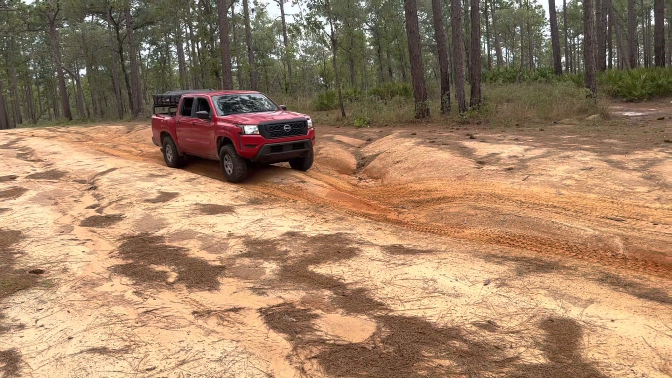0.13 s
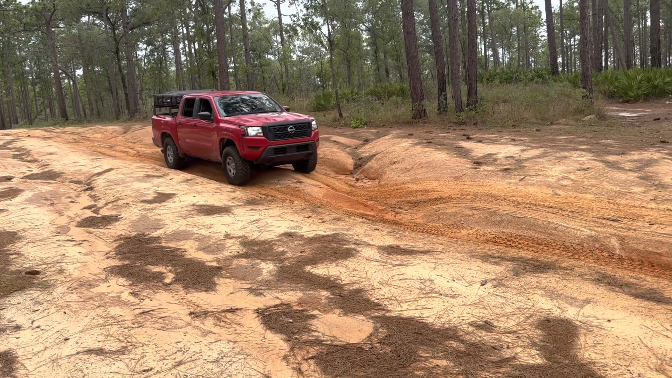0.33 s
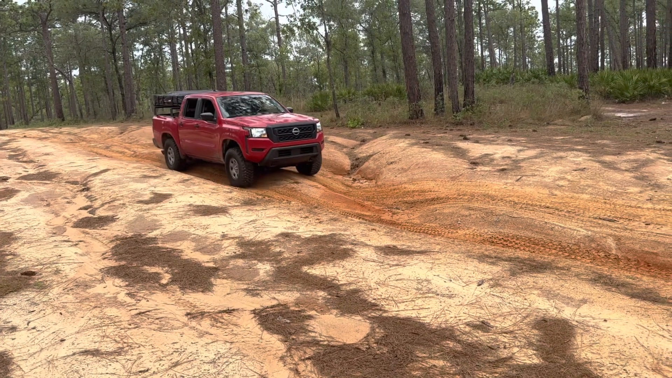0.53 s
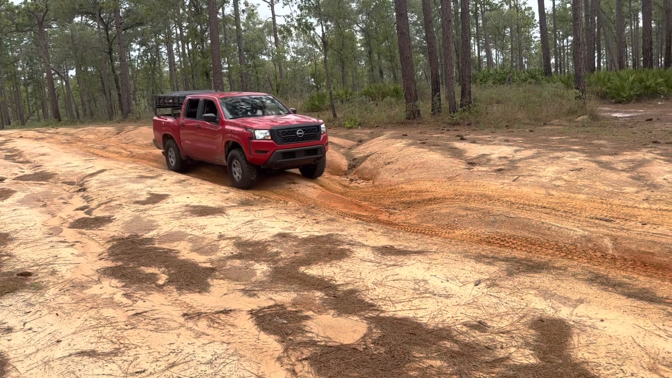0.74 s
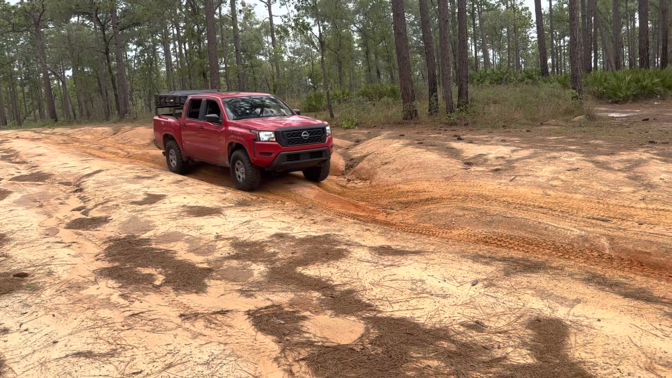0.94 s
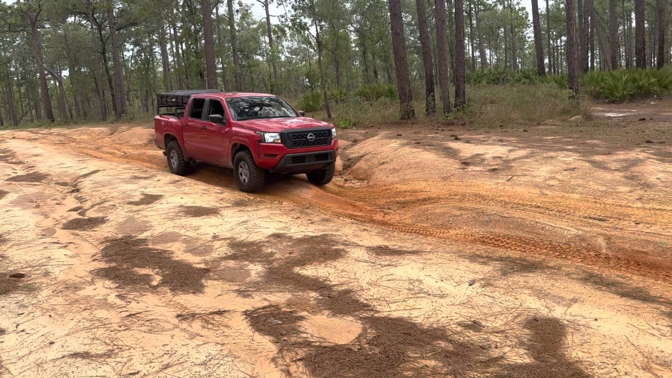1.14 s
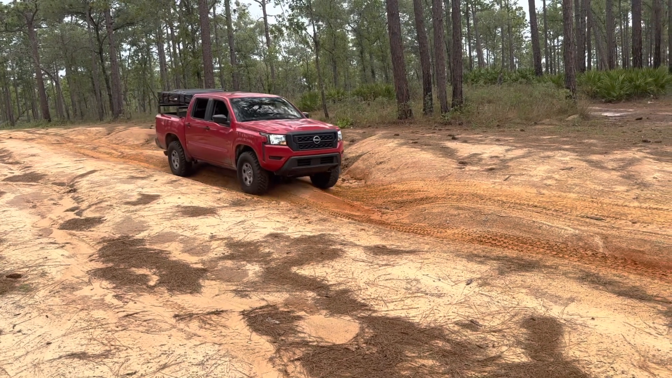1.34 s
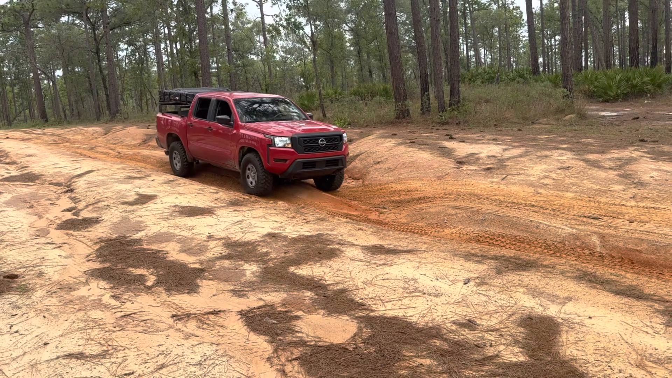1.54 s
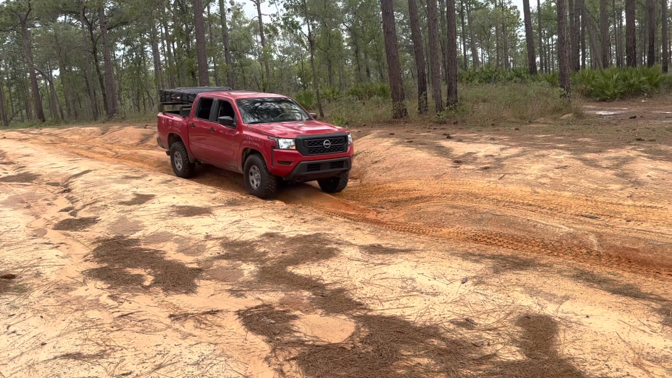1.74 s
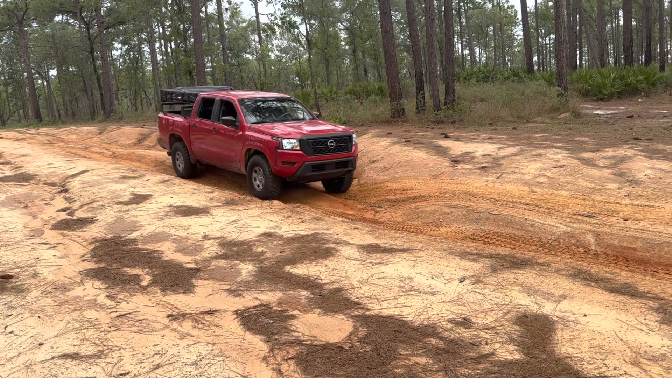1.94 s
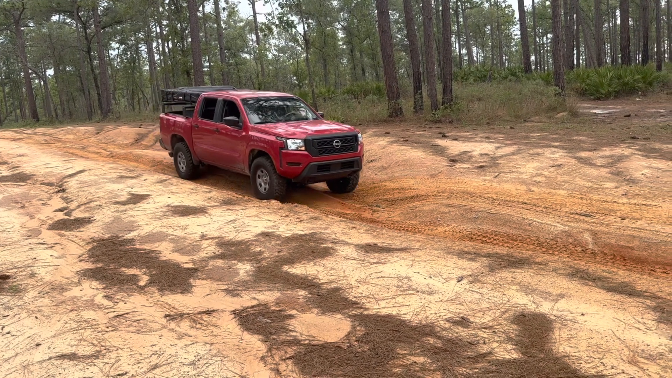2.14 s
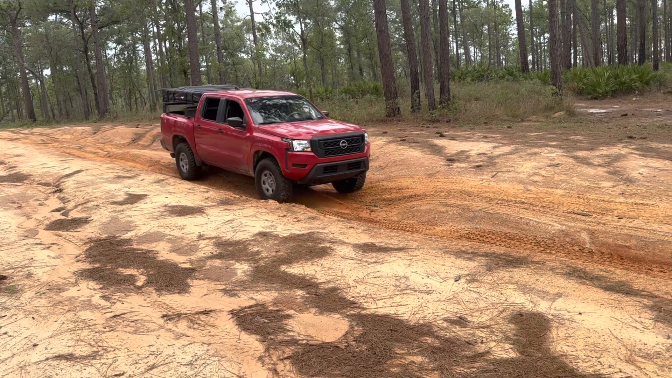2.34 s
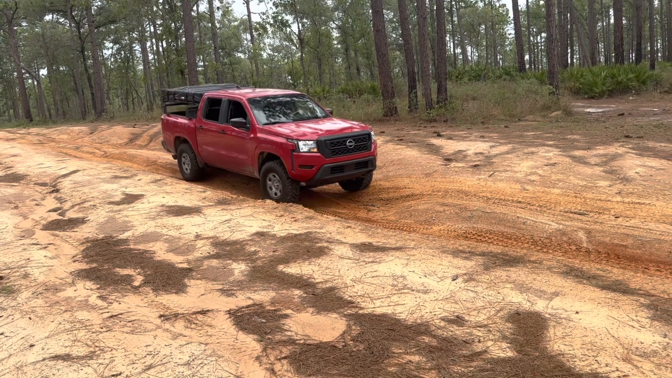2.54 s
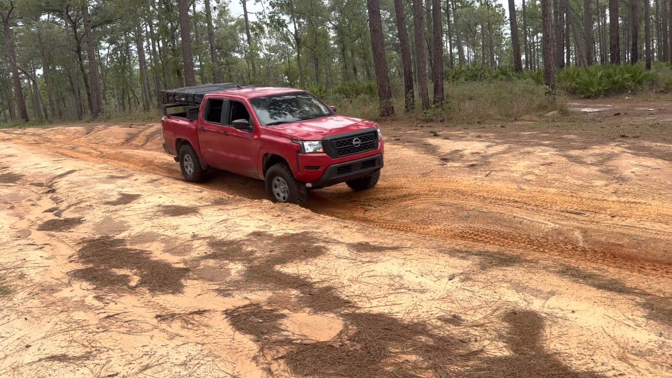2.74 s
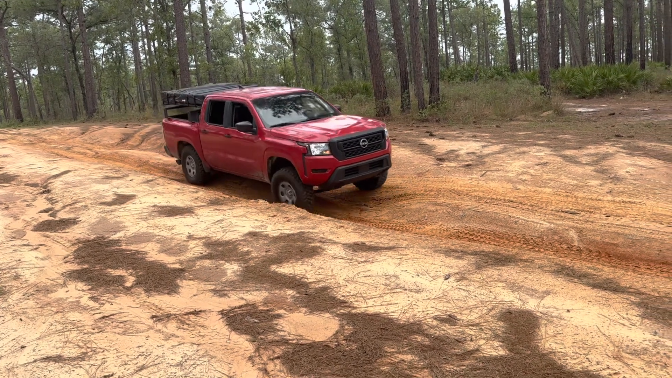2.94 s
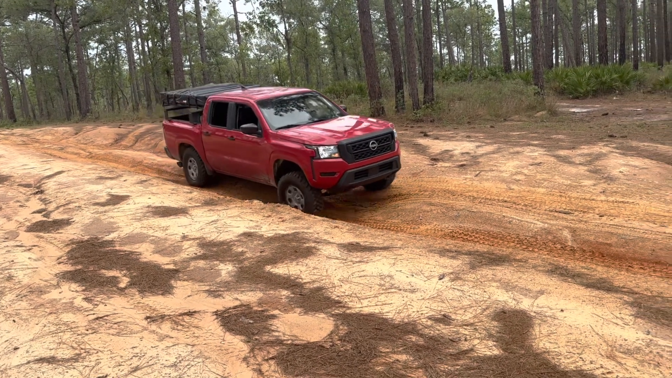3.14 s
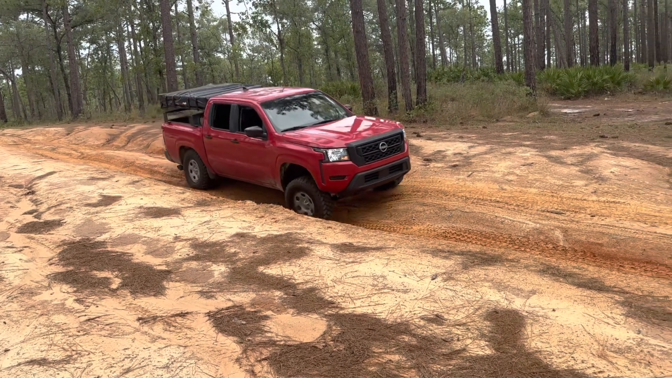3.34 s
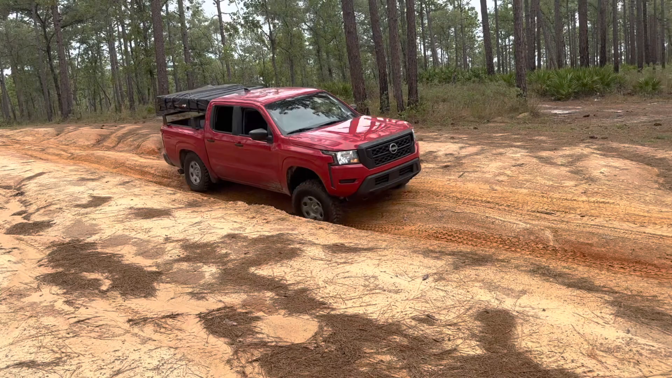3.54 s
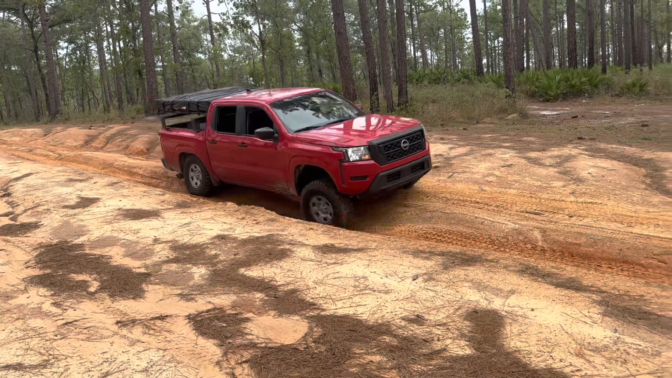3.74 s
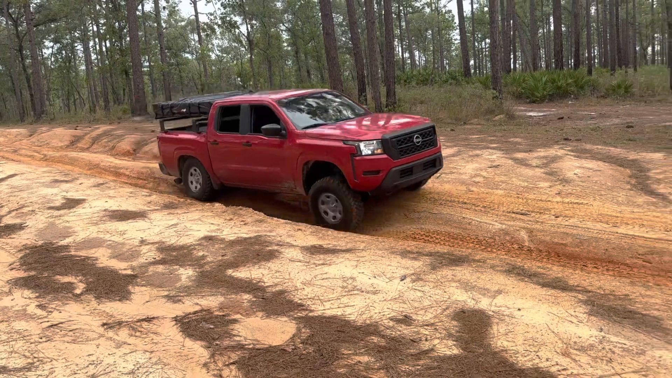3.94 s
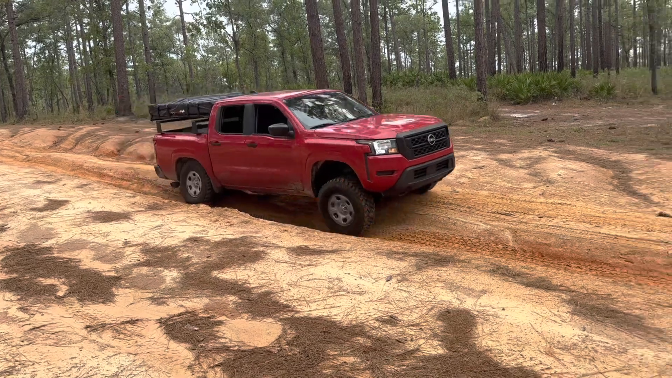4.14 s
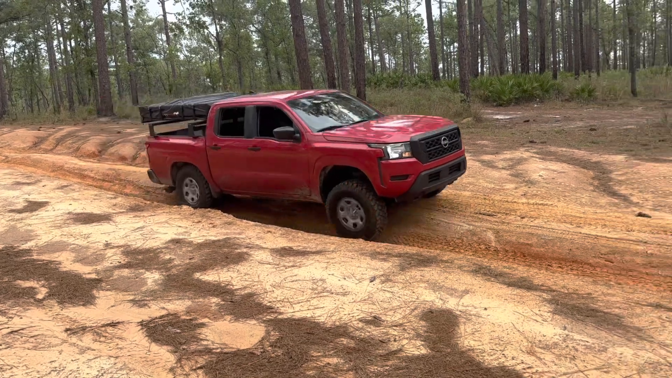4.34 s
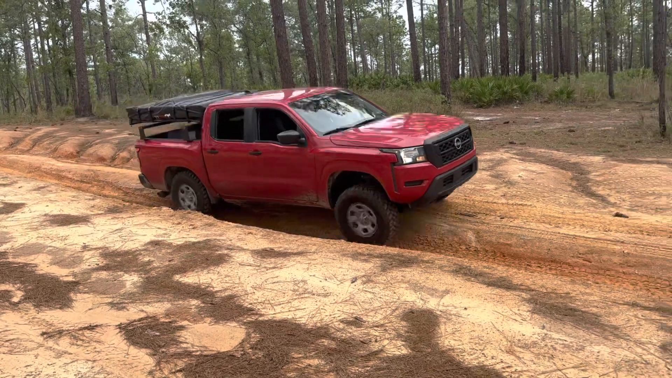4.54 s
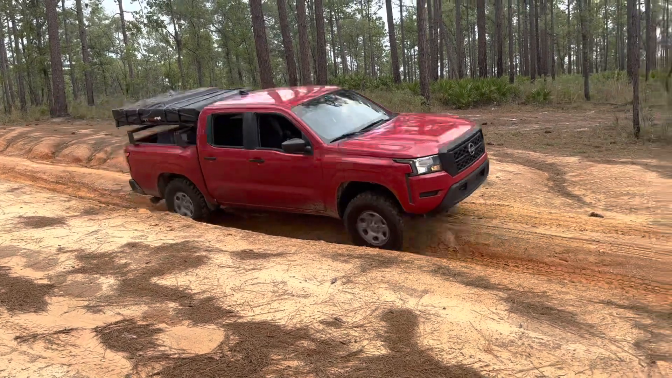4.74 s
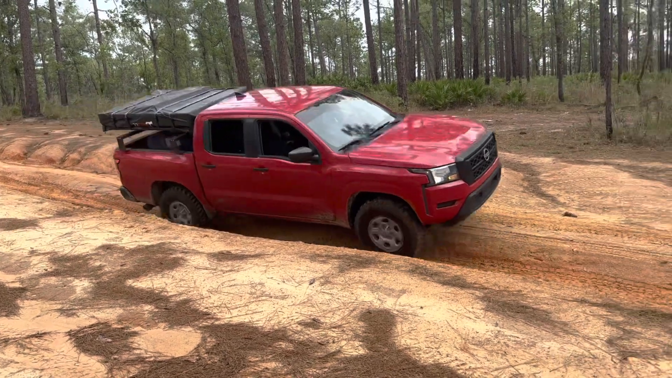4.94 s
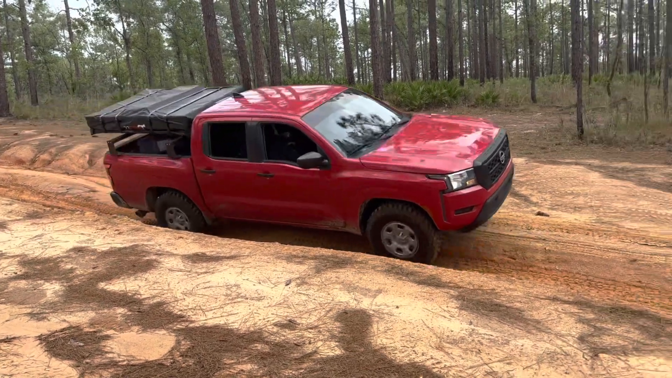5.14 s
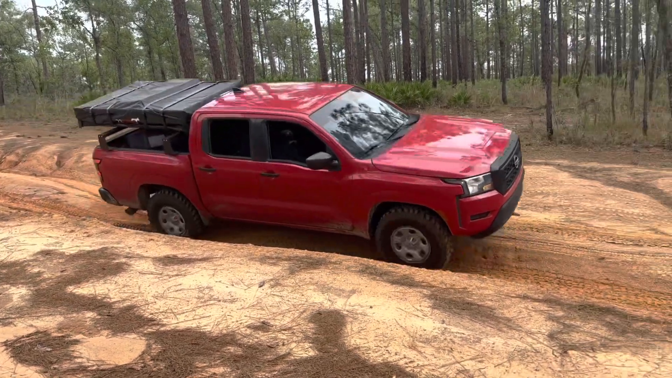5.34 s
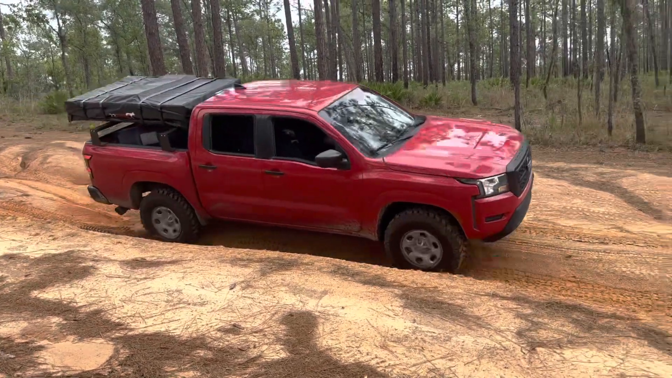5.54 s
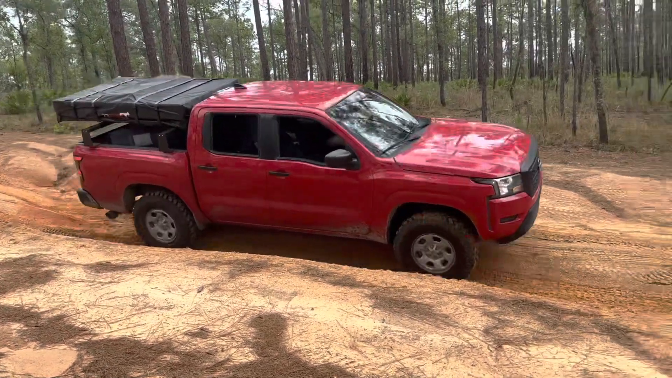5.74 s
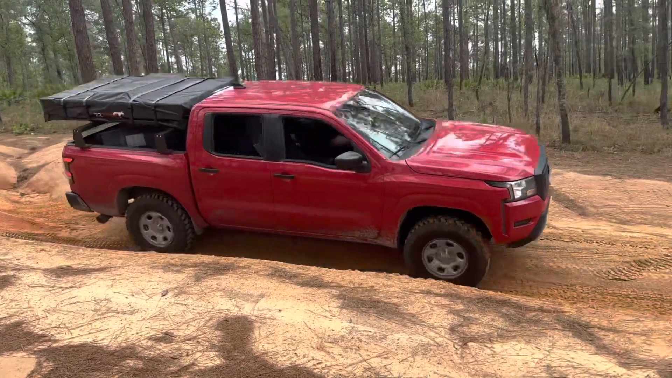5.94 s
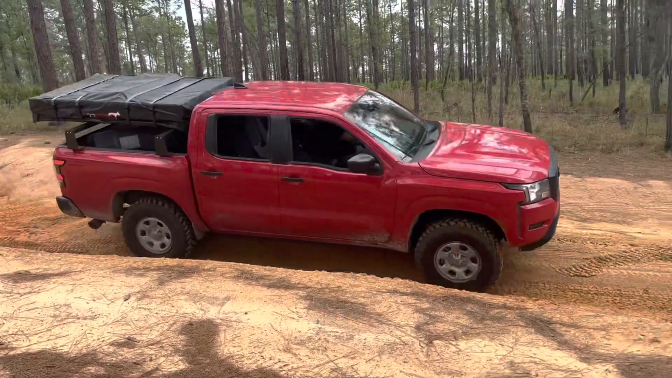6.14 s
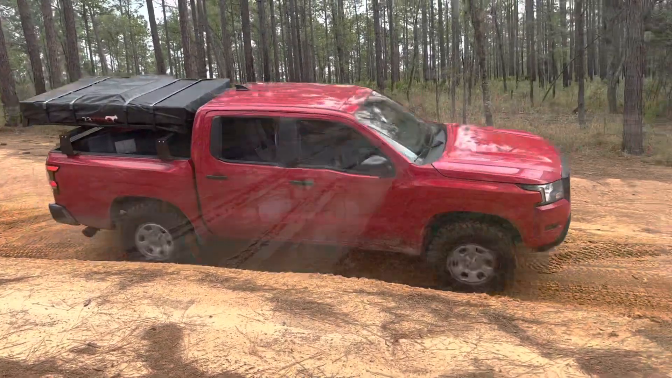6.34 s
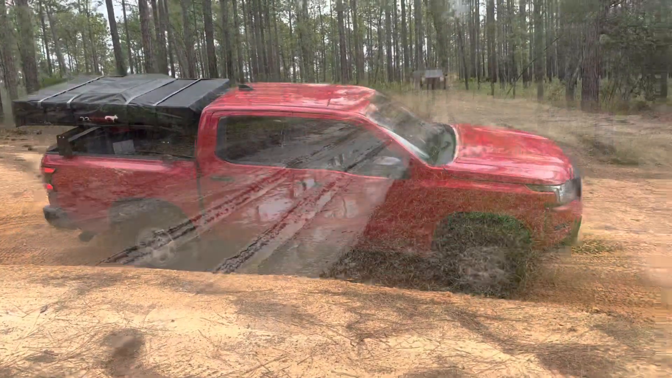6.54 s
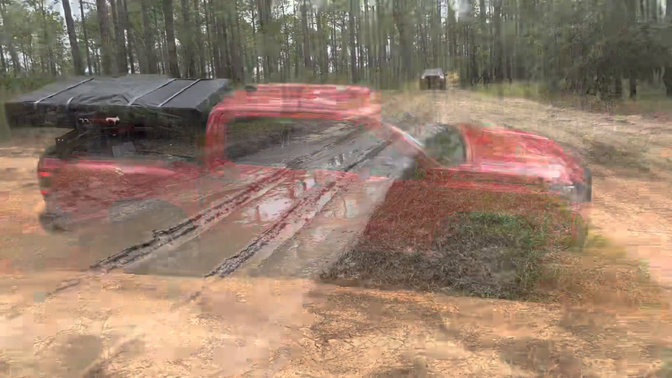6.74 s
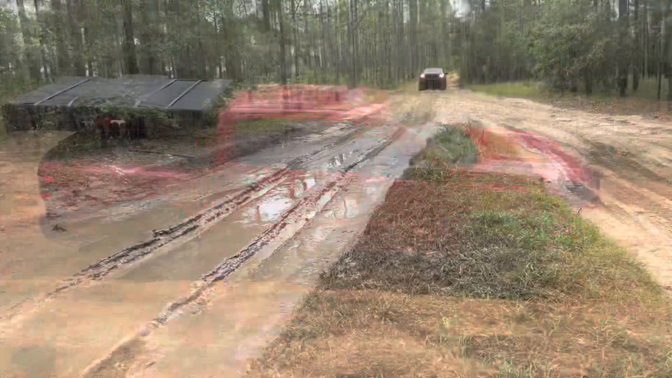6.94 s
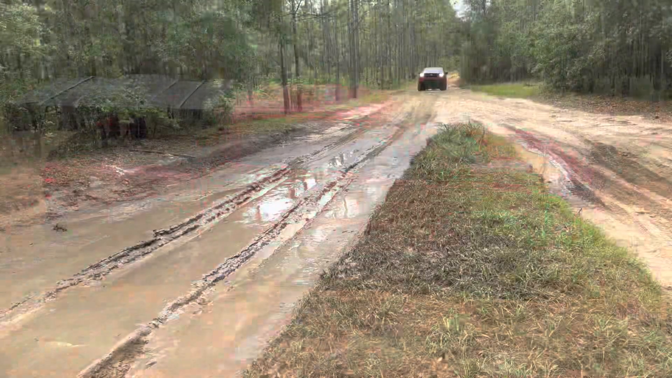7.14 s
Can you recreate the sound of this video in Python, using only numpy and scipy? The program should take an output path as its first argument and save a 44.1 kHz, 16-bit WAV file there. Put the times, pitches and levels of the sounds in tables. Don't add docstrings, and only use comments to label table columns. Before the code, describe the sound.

Open air in a pine wood, stereo microphone beside the trail. From 0 s a pickup some way off runs at a low, lumpy idle, with soft tyre rumble, faint fan hiss and a thin, fuzzy cicada buzz at left; a nearer cicada pulses at the very start and around 1.1-1.7 s. A light knock and rattle comes at 0.7 s, a dull bump near 2 s. The engine sags around 1-2 s, then climbs from 2.6 to 3.5 s into a firmer throb. Clunks with rattles land at 3.6 and 4.4 s as hiss and growl swell. A deep thud at 5 s precedes the strongest hollow knocks at 5.5-5.7 s, then another low thump at 6.2 s with a breathy intake hum and brighter ticking hiss up close. From about 6.4 s it crossfades to a distant, steady low engine drone with one small rev near 6.9 s.

```python
import sys
import numpy as np
from scipy import signal
from scipy.fft import rfft, irfft, next_fast_len
from scipy.io import wavfile
from scipy.ndimage import uniform_filter1d

SR = 44100
rng = np.random.default_rng(int(sys.argv[2]) if len(sys.argv) > 2 else 0)


def natural_amplitude(level_db):
    exponent = np.asarray(level_db, float) / 20
    return 10 ** exponent


def master_out(mix):
    frames = np.transpose(np.atleast_2d(mix))
    ceiling = np.clip(frames, -1, 1)
    pcm = np.round(ceiling * 32767).astype(np.int16)
    wavfile.write(sys.argv[1], SR, pcm)


N = 317070
TIME_S = np.arange(N) / SR
FADE_START_S, FADE_S = 6.38, 0.59


def evened(x):
    return x / np.sqrt(np.mean(x ** 2) + 1e-20)


def read(points, hz):
    f, *columns = np.transpose(points)
    return np.squeeze([np.interp(np.log(hz + 1), np.log(f + 1), c) for c in columns])


def follow(rows):
    s, *columns = np.transpose(rows)
    return [np.interp(TIME_S, s, c) for c in columns]


def bump(s, half_s):
    return np.exp(-((TIME_S - s) / half_s) ** 2)


def ramp(s, length_s):
    return np.clip((TIME_S - s) / length_s, 0, 1)


def drift(per_s):
    steps = np.arange(0, N + 64, 64)
    size = max(int(SR / 64 / per_s), 2)
    slow = uniform_filter1d(rng.standard_normal(len(steps)), size)
    slow = uniform_filter1d(slow, size)
    return evened(np.interp(np.arange(N), steps, slow))


def resonate(x, hz, width):
    turn = np.exp(2j * np.pi * np.cumsum(hz * np.ones(len(x))) / SR)
    r = np.exp(-np.pi * width / SR)
    return 2 * (turn * signal.lfilter([1 - r], [1, -r], x / turn)).real


def ring_in(x, modes):
    size = next_fast_len(len(x))
    hz = np.fft.rfftfreq(size, 1 / SR)
    gain = 0
    for mode_hz, width, db in modes:
        height = natural_amplitude(db) * np.sqrt(SR / (np.pi / 4 * 2 * width))
        gain = gain + height / (1 + 2j * (hz - mode_hz) / width) ** 2
    return irfft(rfft(x, size) * gain, size)[:len(x)]


def noise(shape, patchy_db, size):
    hz = np.fft.rfftfreq(size, 1 / SR)
    hz = hz[hz < shape[-1][0]]
    a, b, patches = rng.standard_normal((4 * N // size + 5, len(hz), 3)).T
    patches = evened(uniform_filter1d(uniform_filter1d(patches, 8, 0), 8, 1))
    z = np.zeros((size // 2 + 1, a.shape[1]), complex)
    z[:len(hz)] = (a + 1j * b) * natural_amplitude(read(shape, hz)[:, None] + patchy_db * patches)
    return evened(signal.istft(z, nperseg=size, noverlap=3 * size // 4)[1][:N])


def cicadas():
    # start_s, end_s, level_db, pitch_hz
    solos = [
        (-.1, 0.222, -69, 7000),
        (1.081, 1.657, -65.5, 7040),
    ]
    beat = (47.3 * TIME_S + 0.18 * drift(2.2)) % 1
    burst = np.exp(-beat / 0.46) * (1 - np.exp(-beat / 0.096))
    singing = [np.clip(np.minimum((TIME_S - start) / 0.12, (end - TIME_S) / .03), 0, 1)
               for start, end, _, _ in solos]

    joined = uniform_filter1d(singing[0] + singing[1], size=8000)
    hz = 7490 - 120 * joined - 206 * ramp(3.81 - .3, 0.49)
    depth = np.clip(0.24 + 0.17 * joined, 0, 1)
    air = rng.standard_normal(N) * (1 - depth * (1 - 3.2 * burst))
    level_db = -62 + 0.8 * drift(1.5) - 6 * ramp(FADE_START_S, FADE_S)
    band = resonate(air, hz + 60 * drift(9.6), 1170)
    out = natural_amplitude(level_db) * evened(resonate(band, hz + 150, 1160))

    for (_, _, db, song_hz), gain in zip(solos, singing):
        tone = np.cos(2 * np.pi * song_hz * (TIME_S - 0.00079 * beat ** 2))
        clicks = burst ** 3 * (tone + 1.8 * rng.standard_normal(N))
        out += natural_amplitude(db) * evened(ring_in(clicks, [(song_hz, 600, 0)])) * gain
    return out


def far_truck():
    # multiple of firing rate, level_db
    far_orders = [(1.5, -14), (2, -4), (3, 2), (4, -37), (5, -14), (6, -22), (7, -25), (8, -22.5)]
    rev_hz = 1.91 * bump(6.89, 0.161)
    sag_hz = .3 * ramp(7.02, .2)
    turns = np.cumsum(40.5 + rev_hz - sag_hz) / SR
    lines = 0
    for k, db in far_orders:
        wave = np.cos(2 * np.pi * (k * turns + rng.random()))
        lines = lines + natural_amplitude(db + 0.94 * drift(11)) * wave
    return np.sqrt(2) * natural_amplitude(-36) * ramp(6.53, 0.12) * lines


def truck_noise(turns):
    # time_s, gain_db
    nearness = [(0, 0), (1.3, 0.3), (1.46, 2.6), (1.76, -1.1), (2.26, 2), (2.8, 3), (3.5, 6), (3.75, 7),
                (4.5, 8.5), (5.3, 7), (5.9, 8.5), (6.25, 10), (6.6, 7.5), (7.19, 4.5)]
    # time_s, ground_rumble_db, half_length_s
    heaves = [(.2, 2, .2), (.65, -12, .08), (0.923, 5, .04), (1.749, -5, .08), (2.35, 6.5, .14),
              (3.8, 5, .07), (4.6, -6, 0.25), (5.006, 12, 0.054), (5.405, 6.5, 0.1), (5.629, 12, 0.15),
              (5.87, 9.5, 0.077), (6.35, 4, 0.12), (6.745, 9.5, 0.15), (7.041, -16, 0.053)]
    # pitch_hz, level_db per Hz
    rumble_shape = [(15, -42), (30, -34), (47, 1.5), (62, 1.5), (90, -3), (130, -8.5), (200, -42)]
    growl_shape = [(90, -2), (140, 2), (210, 1.5), (300, -4), (420, -5.5), (550, -10.5), (700, -19),
                   (1000, -19)]
    hiss_shape = [(400, -10), (700, -9.5), (900, -5), (1080, -5.5), (1500, -1.5), (2000, -5), (2300, -7),
                  (3200, -8), (3650, -14), (4250, -11.5), (5050, -15), (5700, -16), (7000, -19),
                  (9000, -54)]
    fizz_shape = [(4500, -18), (6500, -18), (8500, 2.5), (9800, -9), (10800, -5.5), (12000, -13.5),
                  (13500, -9.5), (16500, -10.5)]
    # pitch_hz, width_hz, level_db over the hiss
    housings = [(1070, 120, -8), (1290, 80, -18), (2000, 260, -10), (4250, 220, -19), (5050, 240, -18)]
    # pitch_hz, width_hz, level_db
    pump_modes = [(4904, 250, 0), (9370, 2260, 6), (9970, 990, 0), (11500, 3100, 0.5)]

    (near_db,) = follow(nearness)
    rumble_db = -47.5 + .45 * near_db + sum(db * bump(s, half_s) for s, db, half_s in heaves)
    growl_db = -53.5 + 0.7536 * near_db + 6 * ramp(FADE_START_S, FADE_S) + 0.7 * drift(8.2)
    hiss_db = -62 + near_db + .5 * drift(29)
    fizz_db = -71.5 + 0.1416 * near_db ** 2
    tick_db = 2.5 - 0.73 * near_db

    strokes = 2 * turns
    stroke_number = strokes.astype(int)
    blow = natural_amplitude(2.0 * rng.standard_normal(N // 100)[stroke_number] - 1.5 * (stroke_number % 2))
    rattle = blow * np.exp(-(strokes % 1) / 0.41) * rng.standard_normal(N)
    ticks = evened(ring_in(rattle, pump_modes))
    bay = natural_amplitude(fizz_db) * (noise(fizz_shape, 1.5, size=512) + natural_amplitude(tick_db) * ticks)

    throb = 1 + 0.096 * np.cos(2 * np.pi * turns) + 0.096 * np.cos(4 * np.pi * turns)
    rumble = natural_amplitude(rumble_db) * noise(rumble_shape, .9, size=4096)
    growl = natural_amplitude(growl_db) * throb * noise(growl_shape, 0.99, size=2048)
    bands = ring_in(rng.standard_normal(N), housings)
    hiss = natural_amplitude(hiss_db) * (noise(hiss_shape, 0.44, size=1024) + bands)
    return rumble + growl + hiss + bay


def knocks():
    # time_s, ground_push_db
    pushes = [(2.049, -37), (3.63, -50), (4.965, -25), (5.466, -43), (5.574, -31), (5.645, -38),
              (5.709, -29), (5.87, -33), (6.238, -24.5), (6.59, -45)]
    # time_s, ring_db, ring_hz
    clunks = [(.72, -37, 536), (2.049, -39.5, 215), (2.343, -42, 500.5), (3.14, -39.5, 420),
              (3.586, -35.5, 520), (3.606, -32, 382), (3.63, -32.5, 168), (3.75, -38.5, 245),
              (4.358, -34.5, 342), (4.365, -34.5, 508), (4.39, -35, 430), (4.965, -37, 205),
              (5.119, -39, 280), (5.466, -40, 262), (5.574, -15.5, 222), (5.593, -25, 219.5),
              (5.645, -21.5, 207.3), (5.709, -31, 204), (5.87, -34.5, 178), (6.59, -34, 190)]
    # time_s, rattle_db, rattle_hz
    rattles = [(.679, -54.5, 2880), (.72, -53, 1980), (2.23, -52, 3800), (2.325, -49, 1230),
               (3.14, -55, 900), (3.52, -55.5, 901), (3.585, -47.5, 975), (3.75, -52, 899),
               (4.358, -44.5, 1519), (4.362, -46, 4100), (4.39, -49, 1190), (4.965, -61, 2499),
               (5.112, -45.5, 845), (5.14, -47, 1040), (5.464, -42, 1120), (5.574, -39, 1211),
               (5.593, -40, 1090), (5.645, -49, 1100), (6.244, -54, 6700), (6.59, -59, 1000),
               (7.151, -55.5, 3600)]
    out, t = np.zeros(N + SR), np.arange(SR // 6) / SR

    push = np.sin(2 * np.pi * 75 * t) * np.exp(-((t - .012) / 0.007) ** 2)
    for s, db in pushes:
        out[round(s * SR):][:len(t)] += natural_amplitude(db) * push

    for s, db, hz in clunks:
        ring = np.sin(2 * np.pi * hz * t)
        ring += 0.68 * np.sin(2 * np.pi * 0.83 * hz * t)
        ring += 0.21 * np.sin(2 * np.pi * 1.5 * hz * t)
        fall = natural_amplitude(db - 60 * t * hz / 37)
        out[round(s * SR):][:len(t)] += ring * fall * (1 - np.exp(-t / 0.0034)) ** 2

    shakes = rng.standard_normal((len(rattles), len(t)))
    shakes[:, 40] += 22
    rise = 1 - np.exp(-t * 500)
    for (s, db, hz), shake in zip(rattles, shakes):
        wide = resonate(resonate(shake, 1.15 * hz, 6.0 * hz), 1.15 * hz, 6.0 * hz)
        parts = evened(resonate(wide, hz, 0.39 * hz)) + 0.19 * evened(wide)
        fall = natural_amplitude(db - 60 * t / 0.069)
        out[round(s * SR):][:len(t)] += parts * fall * rise
    return out[:N]


def intake():
    # time_s, level_db, half_length_s, pitch_hz
    hums = [(.2, -58, 0.39, 296.9), (.62, -56, 0.23, 288.6), (4.54, -56, 0.13, 280),
            (4.92, -53.5, .25, 292.9), (5.948, -55, 0.13, 299), (6.25, -47.5, .12, 318.3),
            (6.498, -51.5, 0.17, 313.5), (7.0, -55, .3, 303.5)]
    swells = np.array([natural_amplitude(db) * bump(s, half_s) + 1e-9 for s, db, half_s, _ in hums])
    loudness = swells.sum(axis=0)
    hz = np.transpose(hums)[3] @ swells / loudness
    whistle = resonate(resonate(rng.standard_normal(N), hz, 7.3), hz, 6.9)
    return loudness * evened(whistle)


def exhaust():
    # time_s, shaft_hz
    speed = [(0.0, 18.4), (0.39, 18.6), (0.76, 16.4), (1.08, 15.4), (1.26, 15.6), (1.58, 15.5),
             (2.09, 15.9), (2.62, 17.7), (2.75, 17.5), (2.87, 18.3), (3.4, 23), (3.62, 23.5), (4.09, 24.3),
             (4.61, 24.4), (5.1, 25.3), (5.29, 25.3), (5.76, 23.3), (6.0, 25.1)]
    # time_s, level_db
    loudness = [(0, -41.5), (.3, -41.5), (.58, -36), (.9, -40), (1.55, -41.5), (2.25, -43.5), (2.55, -41),
                (2.75, -48), (3, -48), (3.3, -44.5), (3.65, -40.5), (4.05, -35.5), (4.45, -36), (4.9, -33),
                (5.46, -34.5), (5.9, -33.5), (6.4, -36.5), (6.9, -42.5)]
    # shaft_order, idling_db, pulling_db
    pattern = [(2, -20, 6), (3, -12, -39), (4, -0.5, 2), (5, -7.5, 0.5), (6, 0.5, -22), (7, -1, -27),
               (8, -40, 5), (9, -7, -6), (10, -13, -3), (11, -2, 3.5), (12, -2.5, 1), (13, -12, -4)]
    # pitch_hz, level_db
    pipe_shape = [(30, -30), (50, -24), (75, -5.5), (98, 2), (113, 0.5), (130, -7.5), (150, -22),
                  (200, -17), (250, -25), (300, -19.5), (380, -45)]
    # shaft_hz, odd_orders_db
    odd_orders = [(15.6, -10), (17.4, -12.5), (18.5, 2.2), (20.2, 1), (21.6, 9), (22.8, -5), (24.2, -3.5),
                  (25.2, -3)]

    (hz,), (level_db,) = follow(speed), follow(loudness)
    level_db = level_db - 80 * ramp(6.9, 0.9)
    turns = np.cumsum(hz * (1 + 0.0016 * drift(7.1))) / SR + 0.367
    orders, idle_db, pull_db = np.transpose(pattern)[:, :, None]
    slow_hz = hz[::64]
    load = np.clip((slow_hz - 18.5) / 2.86, 0, 1)
    order_db = idle_db + load * (pull_db - idle_db) + read(odd_orders, slow_hz) * (orders % 2)
    sizes = natural_amplitude(read(pipe_shape, orders * slow_hz) + order_db)
    sizes = np.repeat(sizes / np.linalg.norm(sizes, axis=0), 64, axis=1)[:, :N]
    waves = []
    for k in orders[:, 0]:
        phase = k * turns - .025 * (k - 5.5) ** 2
        waves.append(natural_amplitude(0.35 * drift(6)) * np.cos(2 * np.pi * phase))
    return np.sqrt(2) * natural_amplitude(level_db + 1.33) * np.sum(sizes * waves, axis=0), turns


def scene():
    pipe, turns = exhaust()
    direct = pipe + intake() + far_truck() + truck_noise(turns) + cicadas() + knocks()
    z = signal.stft(direct, nperseg=512, noverlap=384)[2]
    stir = np.exp(2j * np.pi * rng.random(z.T.shape).T)
    stirred = signal.istft(z * stir, nperseg=512, noverlap=384)[1][:N]
    return np.array([direct, 2 * stirred])


def band_limit(x):
    return signal.sosfilt(signal.butter(12, 15640, fs=SR, output="sos"), x)


def record(dry):
    # pitch_hz, left-right likeness (0-1), left_lead_radians,
    # left_over_right_db
    stereo = [(40, .95, .35, .3), (90, .965, .1, .7), (170, .99, 0, .8), (400, .99, .03, .4),
              (750, .8, 0, 1.2), (1400, .87, -.35, -.2), (3700, .58, .6, -2.3), (5900, .45, .3, 1),
              (7600, .62, 2.3, 5), (8250, .99, 3.14, 0), (8800, .99, 3.14, 0), (9200, .8, 1.1, 0),
              (10700, 1, 0, 0), (13000, 1, 0, 0), (14400, .5, -.9, 0), (15300, .9, -3, 0)]
    size = next_fast_len(N + SR // 4)
    hz = np.fft.rfftfreq(size, 1 / SR)
    same, lead, balance_db = read(stereo, hz)
    same = np.clip(same, 0, 1)
    bass_cut = hz ** 4 / (hz ** 4 + 30. ** 4)
    direct, scattered = rfft(dry, size) * bass_cut
    left = direct * natural_amplitude(balance_db / 2)
    right = natural_amplitude(-balance_db / 2) * (same * direct + np.sqrt(1 - same ** 2) * scattered)
    beside = right * np.exp(-1j * lead)
    ahead = right * np.exp(-1j * lead * (hz > 12000))
    left, beside, ahead = irfft(np.array([left, beside, ahead]), size)[:, :N]
    fade = ramp(6.6, 1.3)
    return band_limit(np.array([left, (1 - fade) * beside + fade * ahead]))


dry = scene()
out = record(dry)
master_out(out)
```